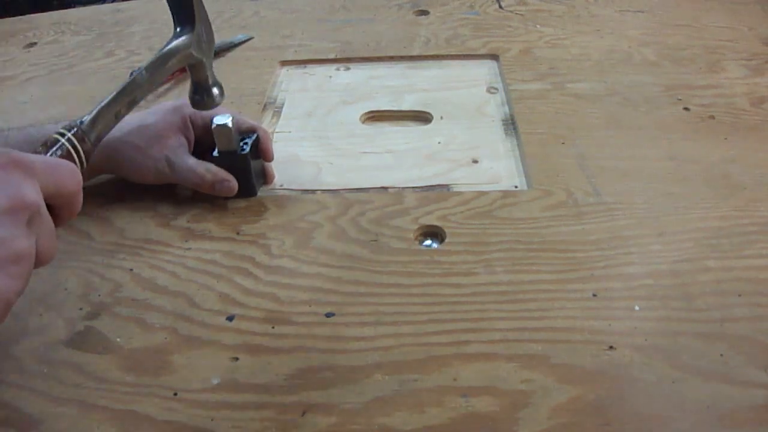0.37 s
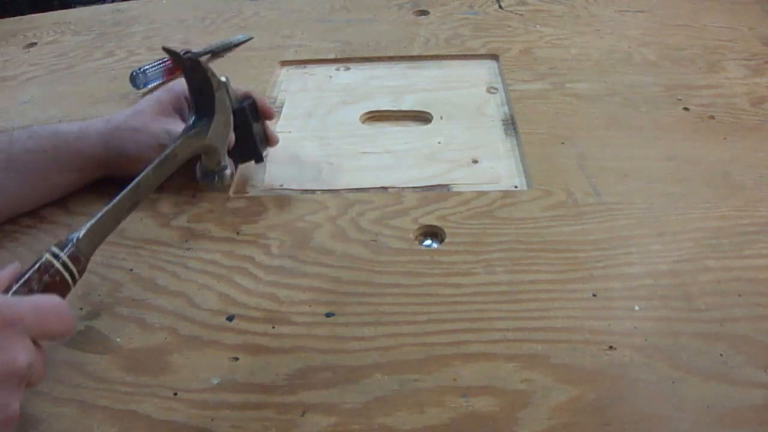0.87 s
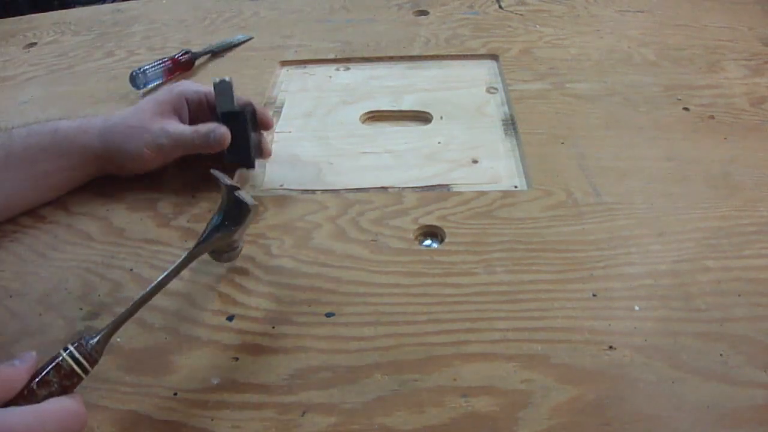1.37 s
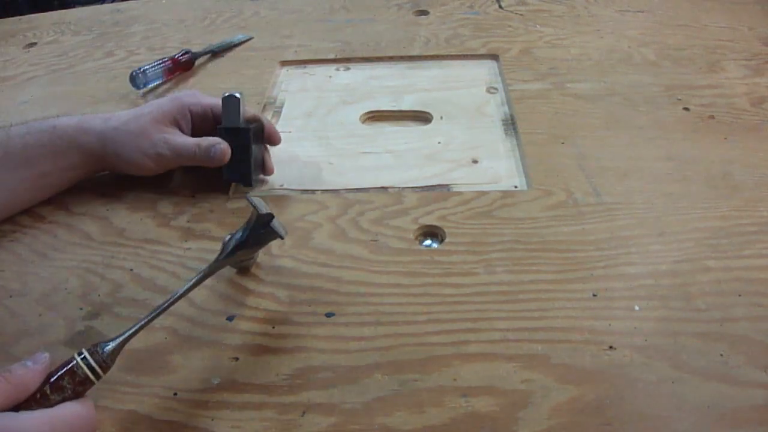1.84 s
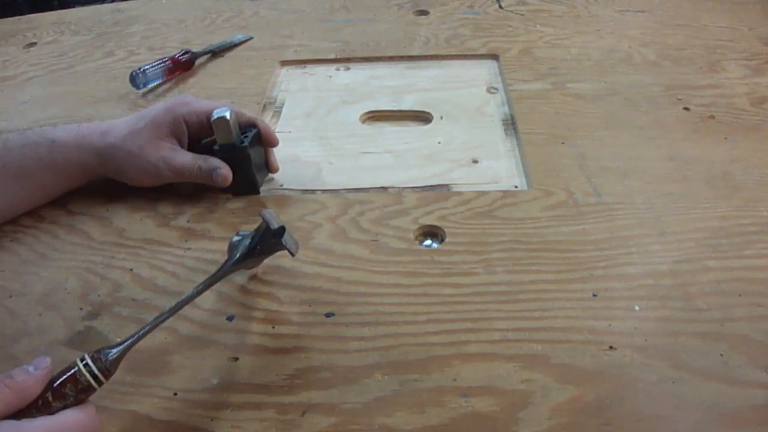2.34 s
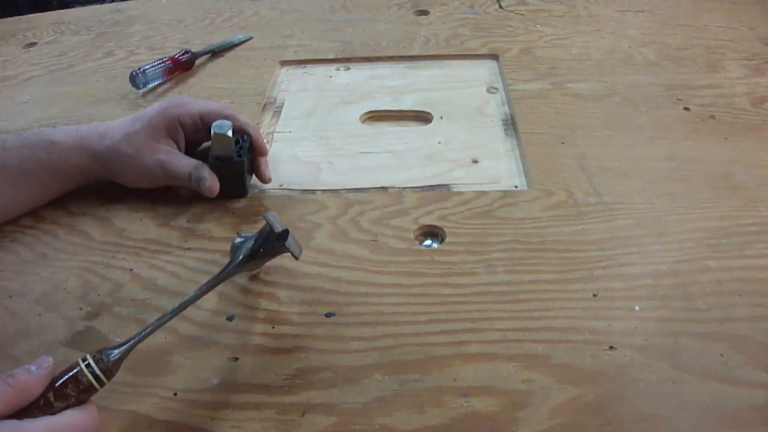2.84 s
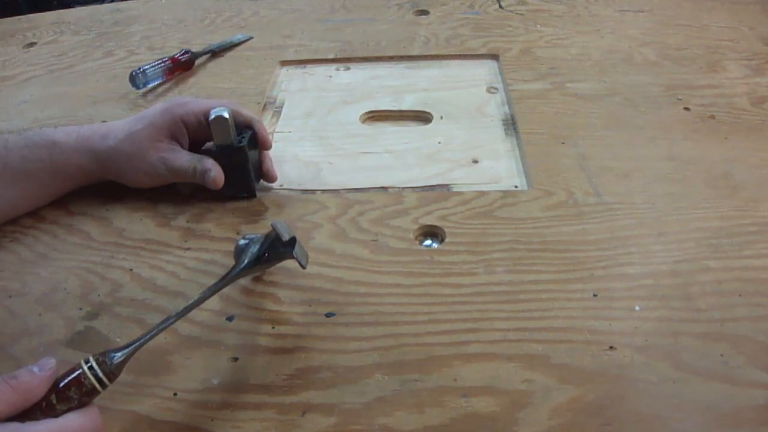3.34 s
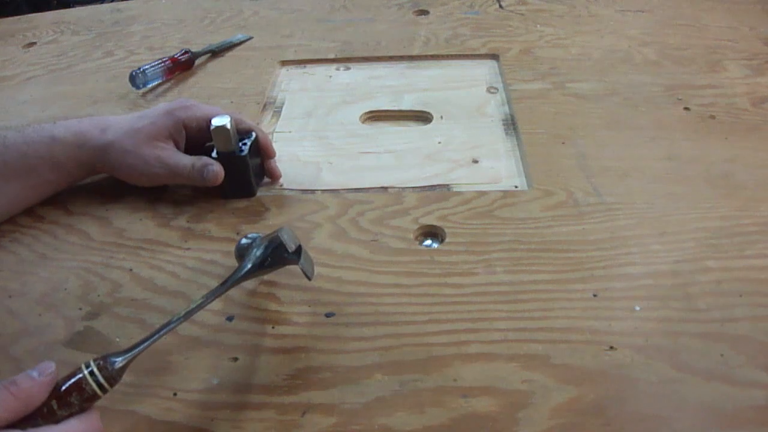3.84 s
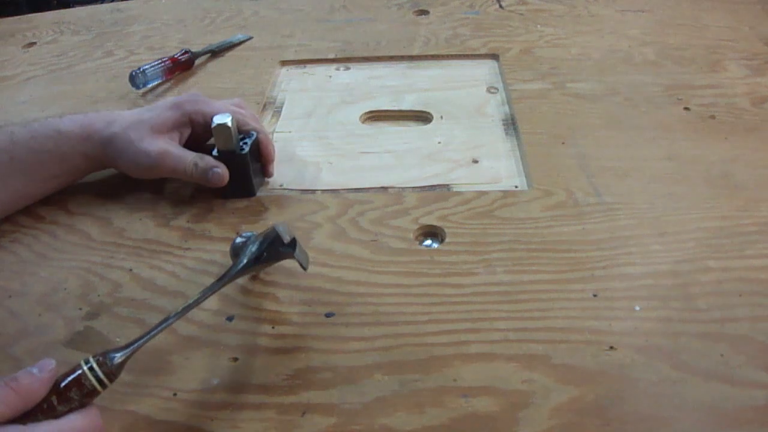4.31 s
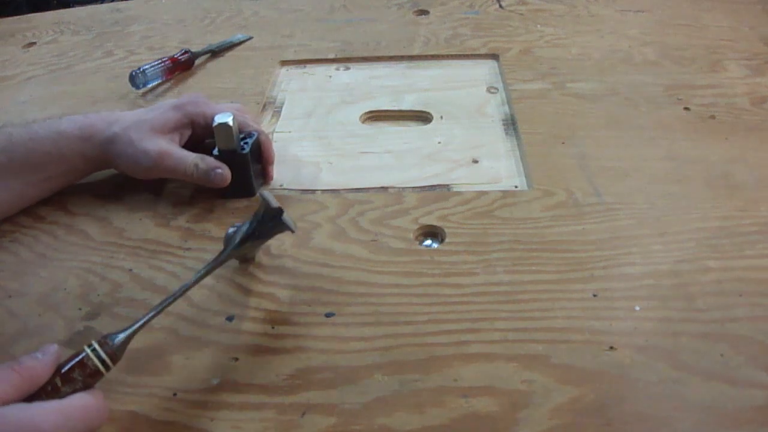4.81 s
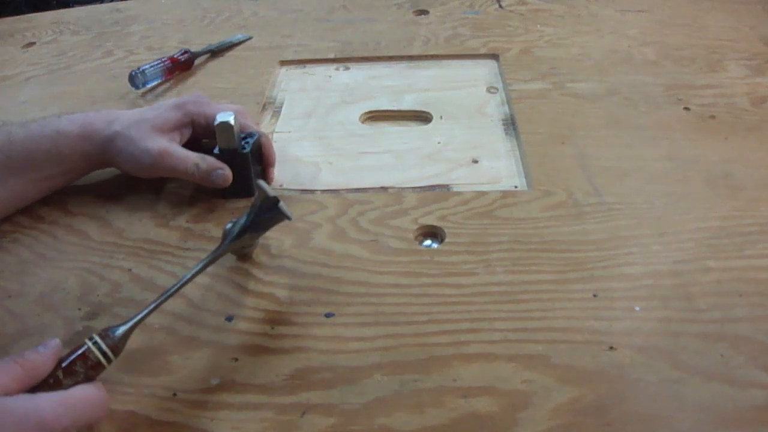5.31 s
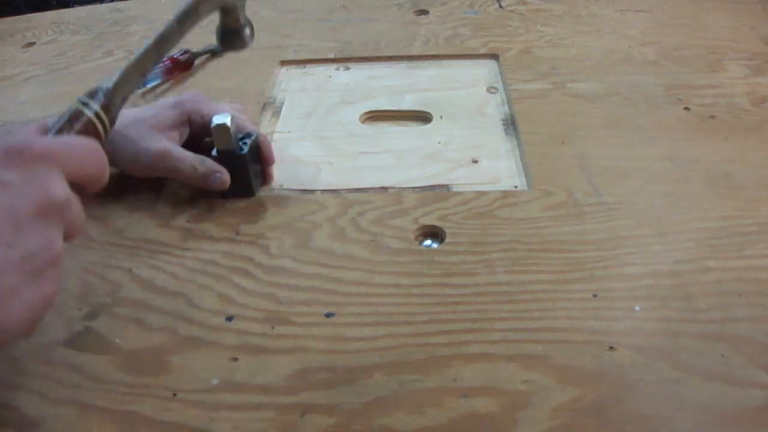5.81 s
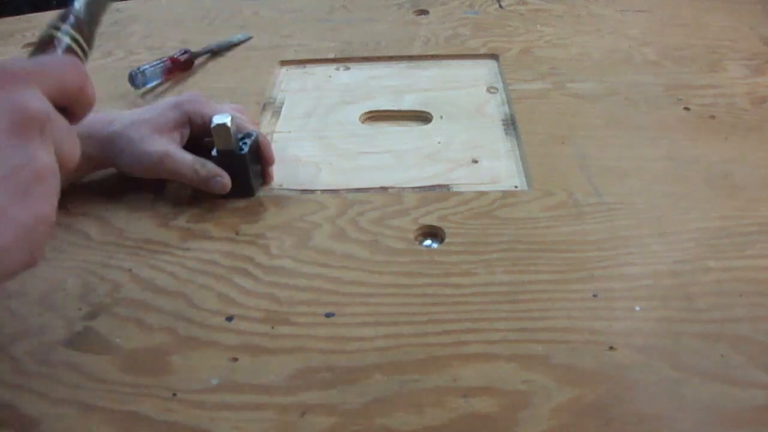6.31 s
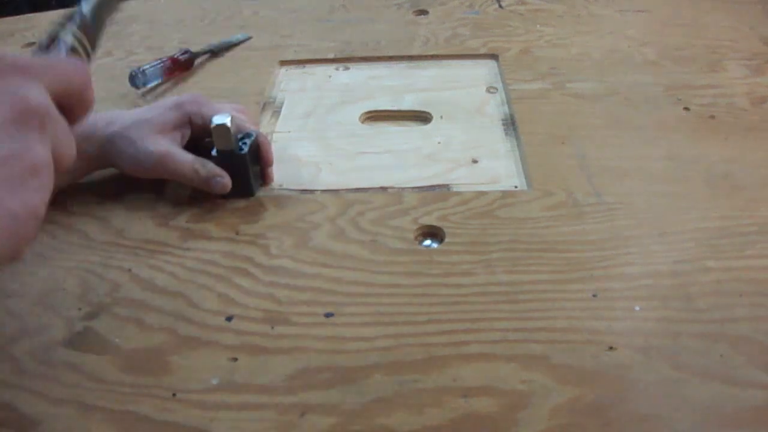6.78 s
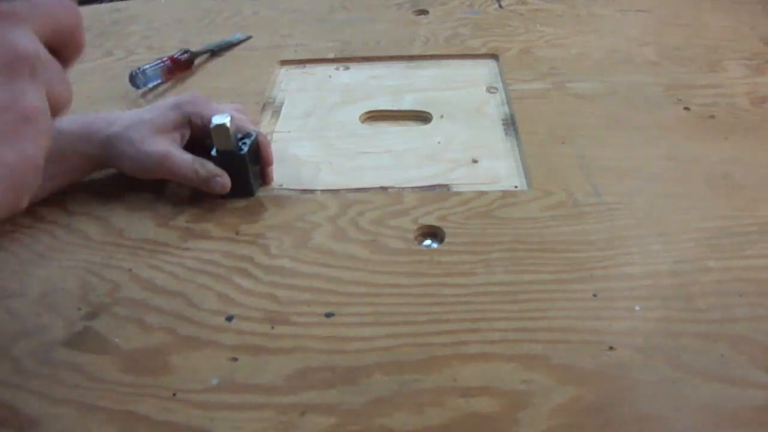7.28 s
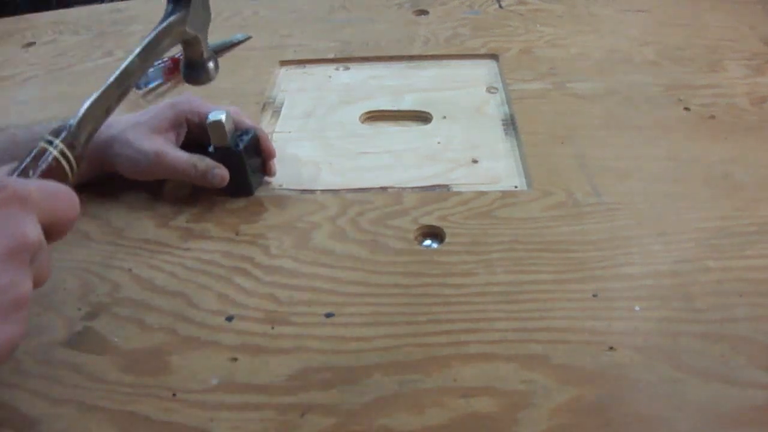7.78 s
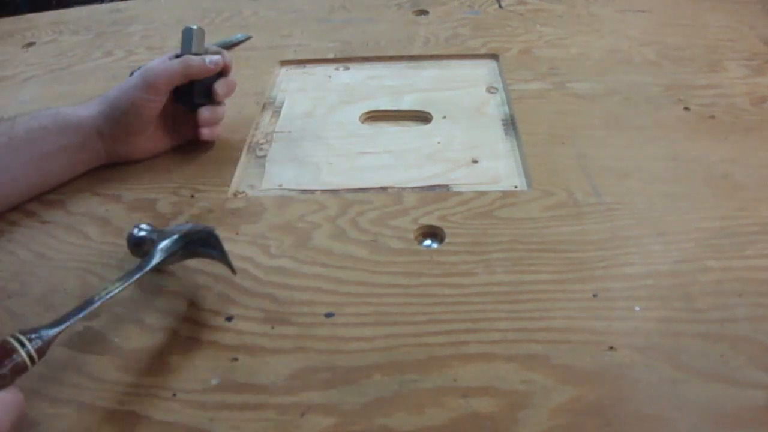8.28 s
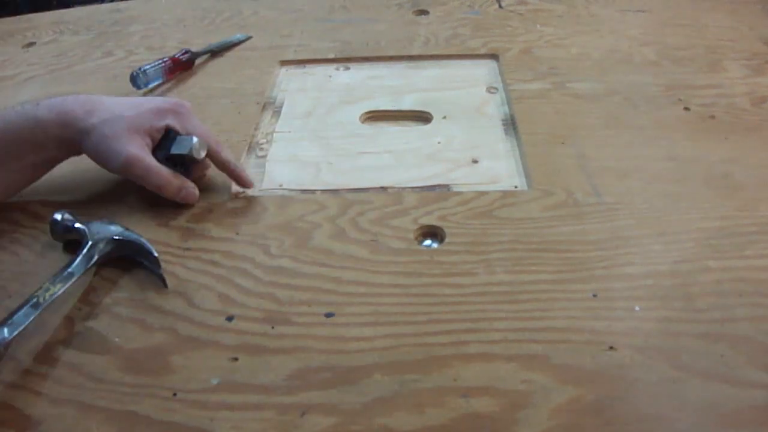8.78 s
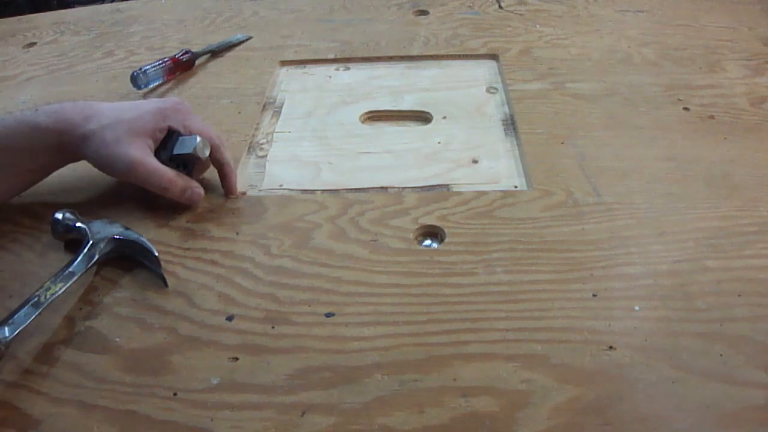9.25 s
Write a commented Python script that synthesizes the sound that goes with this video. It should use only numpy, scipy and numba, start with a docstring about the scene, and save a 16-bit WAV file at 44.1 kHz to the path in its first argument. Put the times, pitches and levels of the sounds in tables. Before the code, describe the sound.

In a bare, reverberant workshop with faint hum, a hammer hits a steel chisel once, a hard crack with woody boom and a short metallic ring. Soft scrapes, chirpy spring clicks and light knocks follow as the tool is reseated. Then three heavy blows land half a second apart, each with a tiny rebound tick, before the tools are put down with knocks and a click. Close microphone, loud hits squashed flat.

```python
"""Mains hum, a thin electrical whine and soft air noise run throughout a bare workshop; faint grit ticks at chance
moments. At 0.2 s a hammer drives a steel corner chisel into a plywood bench top: noise cracks, damped bench and
steel tones, a rebound tick, ringing sheet metal. Short hissing slides follow; from 1.5 s the sprung holder clicks
in chirps as tools knock on the bench. Three more blows fall from 6.6 to 7.5 s, then a few last knocks and clicks
from 8.3 s. A peak limiter flattens every loud blow into a plateau."""
import sys
import numpy as np
from scipy import signal
from scipy.fft import rfft, irfft, next_fast_len
from scipy.io import wavfile
from scipy.ndimage import map_coordinates
from numba import njit

SR = 44100
rng = np.random.default_rng(int(sys.argv[2]) if len(sys.argv) > 2 else 0)


def ratio_of_db(decibels):
    """Turn decibels (scalar or array-like) into linear amplitude factors; 0 dB maps to 1."""
    return 10 ** (np.asarray(decibels, float) / 20)


def wrap_up_sound(samples):
    """Save the sound to the file named by the first command line argument, as 16-bit audio."""
    columns = np.atleast_2d(samples).T
    # keep every value between -1 and 1, then stretch to whole-number steps
    tamed = np.clip(columns, -1, 1)
    steps = np.round(tamed * 32767).astype(np.int16)
    wavfile.write(sys.argv[1], SR, steps)


N = 424683
TIME = np.arange(N) / SR


def unit(x):
    """Scaled to rms 1."""
    return x / np.sqrt(np.mean(x ** 2) + 1e-20)


def along(points, hz):
    """Interpolates (frequency [Hz], value) points on a log-frequency axis."""
    point_hz, value = np.transpose(points)
    return np.interp(np.log(hz + 1), np.log(point_hz + 1), value)


def filtered(x, gain):
    """x through a causal minimum-phase filter with the given gain of frequency."""
    m = 2 * next_fast_len(len(x) // 2 + 4096)
    cepstrum = irfft(np.log(gain(np.fft.rfftfreq(m, 1 / SR)) + 1e-6), m)
    # fold onto positive time
    cepstrum[1:m // 2] *= 2
    cepstrum[m // 2 + 1:] = 0
    response = np.exp(rfft(cepstrum))
    return irfft(rfft(x, m) * response, m)[:len(x)]


def wobble(knots_per_s):
    """A smooth random curve through normal knots."""
    knots = rng.standard_normal(int(N * knots_per_s / SR) + 4)
    return map_coordinates(knots, [TIME * knots_per_s])


def ring(modes, seconds, spread_db):
    """Damped tones struck at full swing, each at a random strength around its level."""
    t = np.arange(int(seconds * SR)) / SR
    total = 0
    for hz, db, t60_s in modes:
        strength_db = db + spread_db * rng.standard_normal()
        total = total + ratio_of_db(strength_db - 60 * t / t60_s) * np.cos(2 * np.pi * hz * t)
    return total


# decay of the shop's reverberation: (frequency [Hz], t60 [s])
SHOP_DECAY = [(150, 0.5), (400, 0.48), (1000, 0.5), (2800, 0.44), (7000, 0.31), (14000, 0.14)]


def add(track, start_s, sound, wet_db, tail_s=.6):
    """Adds a sound and the shop's answer, a noise tail in which each frequency dies at its own speed."""
    size = int(tail_s * SR)
    hz, t, z = signal.stft(rng.standard_normal(size), SR, nperseg=256)
    decay = ratio_of_db(-60 * t / along(SHOP_DECAY, hz)[:, None])
    tail = signal.istft(z * decay, SR, nperseg=256)[1][:size]
    tail *= 1 - np.exp(-(TIME[:size] / 0.00067) ** 2)  # the first walls are close
    heard = ratio_of_db(wet_db) * signal.fftconvolve(sound, tail / np.linalg.norm(tail))
    heard[:len(sound)] += sound
    part = track[round(start_s * SR):][:len(heard)]
    part += heard[:len(part)]


# spectral shape of the air noise: (frequency [Hz], relative density [dB])
AIR_SHAPE = [(20, 13), (45, -25.5), (100, -4.5), (230, -17), (450, -7), (700, -10), (1500, -13.5),
             (3000, -19.5), (6000, -23.5), (8000, -27.5), (10800, -30.5), (16000, -27)]
# air noise: (time [s], level [dB])
AIR_LEVEL = [(0, -47), (3.1, -46), (4.3, -45.5), (5.6, -47.5), (9.63, -45.5)]
# mains hum: (frequency [Hz], mean level [dB rms])
HUM = [(60, -52.5), (120, -62), (180, -88), (240, -69.5), (300, -68), (1437, -71.5)]
# electrical whine: (frequency [Hz], mean level [dB rms])
WHINE = [(7822, -70), (7854, -94), (7881, -82.5), (7913, -70.5)]


def room_tone():
    """Shaped air noise plus steady hum and whine tones, all wavering in level."""
    air = unit(filtered(rng.standard_normal(N), lambda hz: ratio_of_db(along(AIR_SHAPE, hz))))
    air *= ratio_of_db(np.interp(TIME, *np.transpose(AIR_LEVEL)) + .5 * wobble(5))
    tones = np.zeros(N)
    for hz, db in HUM + WHINE:
        tones += ratio_of_db(db + 2.2 * wobble(23.0)) * np.sin(2 * np.pi * (hz * TIME + rng.random()))
    return air + np.sqrt(2) * tones


def crack(fade_s, low_hz):
    """A fading splinter of noise, its spectrum evened out and then high-passed at low_hz. Peak 1."""
    t = TIME[:1024]
    z = rfft(rng.standard_normal(1024) * ratio_of_db(-60 * t / fade_s))
    even = irfft(z / np.abs(z)) * ratio_of_db(-20 * t / fade_s)
    even = filtered(even, lambda hz: 1 / (1 + (low_hz / (hz + 1)) ** 2))
    return even / np.abs(even).max()


# grit and small steel parts: (time [s], peak [dB])
TICKS = [(0.091, -24.5), (1.507, -25), (2.598, -20), (2.805, -33), (3.6501, -44), (4.847, -37),
         (6.9995, -33), (7.4924, -36), (8.388, -27), (9.1618, -40), (9.482, -23)]
# the chisel ticks down again: (time [s], peak [dB])
REBOUNDS = [(0.2604, 20), (6.651, 12), (7.1472, 16.5), (7.655, 4)]


def ticks():
    """Short splinters of treble: the chisel's rebounds, smaller touches and stray grit."""
    grit_count, grit_db, grit_spread_db = 10, -47, 3
    out = np.zeros(N)
    for s, db in REBOUNDS:
        add(out, s, ratio_of_db(db) * crack(0.004, low_hz=8000), wet_db=-8.0)
    grit = []
    for when, size in rng.random((grit_count, 2)):
        grit.append((N / SR * when, grit_db + grit_spread_db * (2 * size - 1)))
    for s, db in TICKS + grit:
        add(out, s, ratio_of_db(db) * crack(0.0071, low_hz=3500), wet_db=-6)
    return out


# bench top modes: (frequency [Hz], relative level [dB], t60 [s])
BENCH = [(229, -6, 0.098), (283, -9.5, 0.1), (396.8, 3.5, 0.066), (453, -4, 0.056), (520, -9.5, 0.11),
         (607.3, 3, 0.076), (682, -2, 0.06), (803, -5, 0.043), (885, -4, 0.041), (1107, -3, 0.022),
         (1245, 3.5, 0.0086), (1470, -16, 0.053), (1640, 4.5, 0.011), (1946, -11, 0.056),
         (2330, -3, 0.0084), (2980, -3.5, 0.019)]


def bench(centre_hz, fall_db, tilt_db, rise_db=9, seat_hz=1000, seat_db=0):
    """Bench modes and a contact pulse in the band the contact drives (slopes in dB/octave). Peak 1.

    The spot struck trades one boom for the other; wood pinched under the holder lifts a band at seat_hz."""
    low_boom, high_boom = 2, 5  # rows of BENCH
    impact_db, seat_octaves = 32, 0.14

    def drive(hz):
        octaves = np.log2((hz + 1) / centre_hz)
        seat = np.log2((hz + 1) / seat_hz) / seat_octaves
        slope_db = np.where(octaves < 0, rise_db, -fall_db) * octaves
        return ratio_of_db(slope_db + seat_db * np.exp(-seat ** 2))

    spot_db = {low_boom: tilt_db / 2, high_boom: -tilt_db / 2}
    modes = [(hz, db + spot_db.get(row, 0), t60_s) for row, (hz, db, t60_s) in enumerate(BENCH)]
    wood = ring(modes, .25, spread_db=3)
    wood[0] += ratio_of_db(impact_db)
    wood = filtered(wood, drive)
    return wood / np.abs(wood).max()


# loose sheet metal modes: (frequency [Hz], relative level [dB], t60 [s])
SHEET = [(395, -53.5, 2.5), (497, -56, 4.2), (700, -60, 1.9), (666, -54.5, 4.1), (837, -44.5, 1.46),
         (1020, -57, 3.1), (944, -71, 1.05), (980, -32.5, 1.32)]


def sheet(seconds):
    """Damped tones of the loose sheet, each swelling and fading on its own."""
    knots_per_s, waver_db = 14, 5
    t = TIME[:int(seconds * SR)]
    knots = rng.standard_normal((len(SHEET), int(knots_per_s * seconds) + 4))
    total = np.zeros(len(t))
    for row, mode in zip(knots, SHEET):
        waver = map_coordinates(row, [knots_per_s * t], order=1)
        total += ratio_of_db(waver_db * waver) * ring([mode], seconds, spread_db=5)
    return total


# hammer: (time [s], strength [dB], loudest pitch [Hz], low boom over high boom [dB], chisel ring re blow [dB])
BLOWS = [(0.175, 23.5, 576, -2, -26), (6.5555, 21, 1038, 14, -32), (7.057, 27.5, 1157, 1.5, -56),
         (7.5421, 29, 996, -5.5, -63)]
# hammer head modes: (frequency [Hz], level re blow [dB], t60 [s])
HAMMER_HEAD = [(3620, -32, .04), (4490, -29, .04), (4950, -26, .05), (5100, -27, .05), (5216, -29, .07),
               (5858, -28, .14), (5885, -26, .15), (5910, -29, .12)]
# chisel mode: (frequency [Hz], t60 [s])
CHISEL = (6864, 0.17)


def blows():
    """Steel on steel cracks, fibres split, the bench booms, hammer, chisel and sheet metal ring."""
    knee_hz, knee_follows = 1075, 0.33  # the knee moves with the loudest pitch (exponent)
    # weaker blows reach the sheet less than in proportion
    hard_blow_db, sheet_grows, sheet_under_db = 30, 1.6, 13
    out = np.zeros(N)
    for s, db, pitch_hz, tilt_db, chisel_db in BLOWS:
        centre_hz = knee_hz * (pitch_hz / knee_hz) ** knee_follows
        wood = bench(centre_hz, 4.66, tilt_db, rise_db=8, seat_hz=pitch_hz, seat_db=9)
        steel = ring(HAMMER_HEAD + [(CHISEL[0], chisel_db, CHISEL[1])], .6, spread_db=1)
        sheet_db = hard_blow_db + sheet_grows * (db - hard_blow_db) - sheet_under_db
        add(out, s, ratio_of_db(db) * wood, wet_db=10.5, tail_s=0.99)
        add(out, s, ratio_of_db(db + 5.0) * crack(0.034, low_hz=2780), wet_db=-49.5)  # steel on steel
        add(out, s + 0.0017, ratio_of_db(db - 10.0) * crack(0.06, low_hz=3500), wet_db=-2)  # fibres
        add(out, s, ratio_of_db(db) * steel, wet_db=1)
        out[round(s * SR):][:2 * SR] += ratio_of_db(sheet_db) * sheet(2)
    return out


# skin and steel over wood: (middle [s], width at half swing [s], grit rms before the stroke [dB], centre [Hz])
SLIDES = [(0.808, 0.14, -58, 4200), (2.296, .08, -55, 8500), (2.403, .08, -47, 5400),
          (3.58, 0.059, -58, 5000), (4.085, 0.092, -51, 4900), (4.27, 0.028, -54, 4470),
          (4.331, 0.033, -56, 4500), (4.494, 0.054, -52.5, 3500), (8.247, 0.048, -49.5, 7000),
          (8.449, .2, -50, 5100), (9.069, 0.028, -50, 5160), (9.289, 0.14, -61, 4670),
          (9.494, 0.025, -36.5, 4900)]


def slides():
    """Grainy band-passed hiss under a smooth stroke."""
    out = np.zeros(N)
    for s, width_s, db, centre_hz in SLIDES:
        stroke = np.hanning(int(2 * width_s * SR))
        grit = rng.standard_normal(len(stroke)) * rng.exponential(size=len(stroke))
        grit = filtered(grit, lambda hz: 1 / (1 + (np.log2((hz + 1) / centre_hz) / 0.68) ** 2))
        add(out, s - width_s, ratio_of_db(db) * stroke * unit(grit), wet_db=-15.5)
    return out


# the holder slips and catches: (time [s], chirp level [dB], chirp pitch [Hz], tick re chirp [dB])
CLICKS = [(1.474, -31, 1640, -2.5), (2.0358, -30, 1770, -10), (2.0837, -21, 1600, -8),
          (2.3219, -7.5, 1800, 2), (2.3277, -22, 1280, 10), (2.3362, -1, 1590, 11),
          (2.3948, -8, 1360, -6.5), (2.4824, -6, 1720, -29), (2.576, -4, 1430, -9), (2.598, -18, 1490, -17),
          (2.7087, -8, 1570, -13), (2.9561, -22, 1680, -27), (3.2698, -25, 1590, -0.5),
          (3.4267, -20.5, 1470, -16), (3.43, -18, 1570, -12), (3.5903, -27.5, 1470, -10),
          (3.6794, -10, 1640, -11), (3.6838, -8.5, 1440, -16), (3.8467, -16.5, 1440, -22),
          (4.0958, -28, 1390, -10), (5.3326, -20.5, 1510, -5.5), (5.9255, -25, 1320, -2),
          (8.3315, -11.5, 1640, -17), (8.5759, 2.5, 1350, 4), (9.4806, -34, 1880, -6)]
# chirp overtones: (multiple of the pitch, level over overtones_db [dB])
OVERTONES = [(2, 11.5), (3, 7.5), (5, -4)]
# colour of the holder's tick: (frequency [Hz], gain [dB])
HOLDER = [(2000, 13), (3200, 10), (4200, 0), (5300, 8.5), (6600, -1), (8500, 4.5), (9500, -2), (10500, 0)]


def clicks():
    """A chirp of a few cycles swells and dies; a coloured tick comes during the swell."""
    swell_s, lead_s, overtones_db = .0014, .0006, -24
    out, t = np.zeros(N), TIME[:1024]
    swell = (t / swell_s * np.exp(1 - t / swell_s)) ** 7.5
    for s, db, hz, tick_db in CLICKS:
        upper = np.zeros(len(t))
        for multiple, level_db in OVERTONES:
            upper += ratio_of_db(level_db) * np.sin(2 * np.pi * (multiple * hz * t + rng.random()))
        chirp = swell * (np.sin(2 * np.pi * hz * t) + ratio_of_db(overtones_db) * swell * upper)
        tick = filtered(crack(0.0078, low_hz=2400), lambda f: ratio_of_db(along(HOLDER, f)))
        tick = np.roll(tick, round(0.46 * swell_s * SR))
        add(out, s - lead_s, ratio_of_db(db) * (chirp + ratio_of_db(tick_db) * tick), wet_db=-13.5)
    return out


# tools and hands on the bench:
# (time [s], peak [dB], loudest pitch [Hz], fall above it [dB/octave], low boom over high boom [dB])
KNOCKS = [(1.5075, -8, 430, 9.5, -1.5), (2.0756, -22, 433, 5, 5), (2.338, 2, 790, 5.5, -2.5),
          (2.703, -17, 830, 4, 16), (3.217, -29, 506, 9.5, 4), (3.255, -26.5, 780, 7.5, 1),
          (3.43, -25.5, 507, 4, 3), (3.627, -17.5, 520, 9, 2), (3.844, -17.5, 935, 4, -1),
          (4.091, -25, 780, 6, 5), (4.511, -33.5, 253, 12.5, 1), (5.089, -41.5, 240, 9, -12),
          (5.218, -24.5, 1580, 19, -4), (5.332, -19, 1110, 18, 11), (5.681, -38, 400, 3.5, 1),
          (5.923, -25.5, 760, 6.5, 6), (8.332, -2.5, 460, 11.5, -3.5), (8.574, 10, 1150, 20, 0.5),
          (9.480, -18.5, 865, 4, -4)]


def knocks():
    """Tools set down and nudged make the bench ring."""
    out = np.zeros(N)
    for s, db, centre_hz, fall_db, tilt_db in KNOCKS:
        add(out, s, ratio_of_db(db) * bench(centre_hz, fall_db, tilt_db), wet_db=2.26)
    return out


def scene():
    """Sums every source in the shop, as one channel."""
    return (room_tone() + ticks() + blows() + slides() + clicks() + knocks())[None]


@njit
def cut_db(over_db, attack, release):
    """Limiter gain cut: chases the excess quickly, lets go slowly (fractions per sample)."""
    cut = np.zeros(len(over_db))
    for i in range(1, len(cut)):
        step = over_db[i] - cut[i - 1]
        cut[i] = cut[i - 1] + step * (attack if step > 0 else release)
    return cut


def low_pass(x):
    """Removes everything above the highest recorded frequency."""
    return signal.sosfilt(signal.butter(12, 16640, fs=SR, output="sos"), x)


# microphone response, thin bass: (frequency [Hz], gain [dB])
MICROPHONE = [(30, -44), (100, -17.5), (200, 1), (350, -1), (16000, 0.5)]
# treble left in the finished mix: nearly empty from 11.3 to 12.7 kHz, weak above: (frequency [Hz], gain [dB])
TREBLE_LEFT = [(11000, -0.5), (11300, -45), (12700, -47), (13000, -7.5), (15000, -23), (16500, -38)]


def record(dry):
    """A peak limiter ducks under each crack and climbs back while the shop dies away; the treble is thinned."""
    ceiling_db, attack_s, release_s, clip_level = -6, 1e-4, .07, .66
    picked = filtered(dry[0], lambda hz: ratio_of_db(along(MICROPHONE, hz)))
    over_db = np.maximum(20 * np.log10(np.abs(picked) + 1e-9) - ceiling_db, 0)
    held = picked * ratio_of_db(-cut_db(over_db, 1 / (attack_s * SR), 1 / (release_s * SR)))
    held = held / (1 + np.abs(held / clip_level) ** 4) ** (1 / 4)  # soft clip
    m = next_fast_len(N)
    treble_gain = ratio_of_db(along(TREBLE_LEFT, np.fft.rfftfreq(m, 1 / SR)))
    mix = irfft(rfft(held, m) * treble_gain, m)[:N]
    return low_pass(mix[None])


dry = scene()
out = record(dry)
wrap_up_sound(out)
```